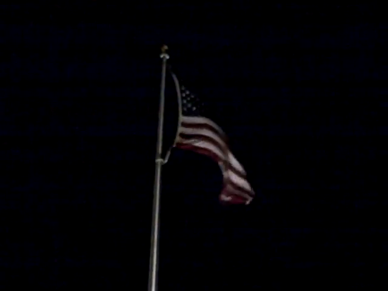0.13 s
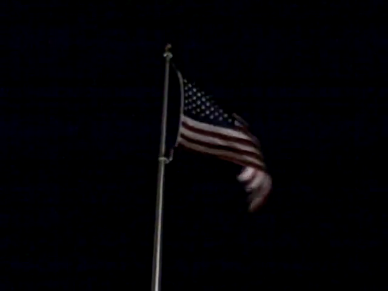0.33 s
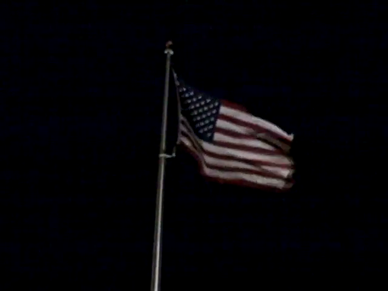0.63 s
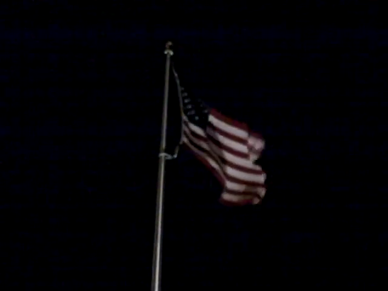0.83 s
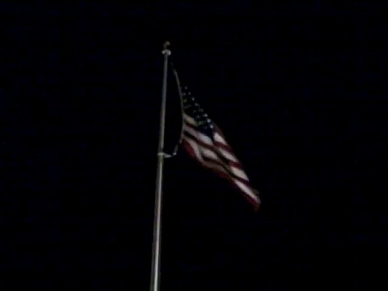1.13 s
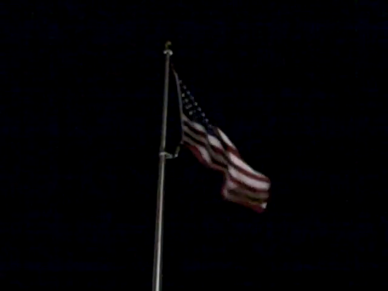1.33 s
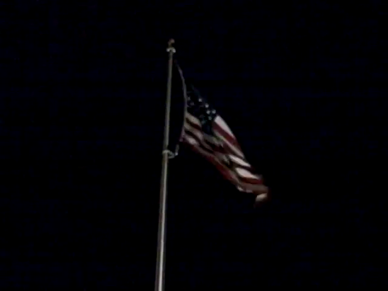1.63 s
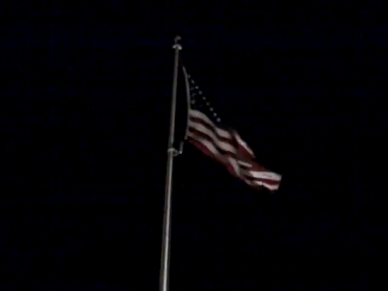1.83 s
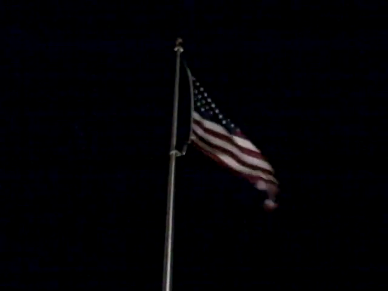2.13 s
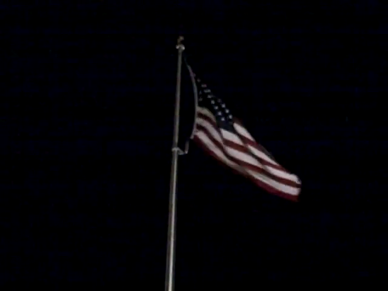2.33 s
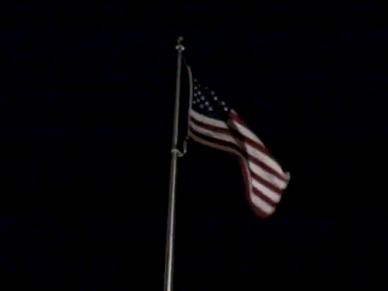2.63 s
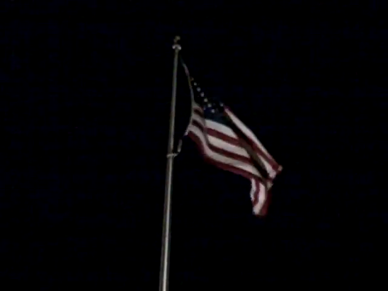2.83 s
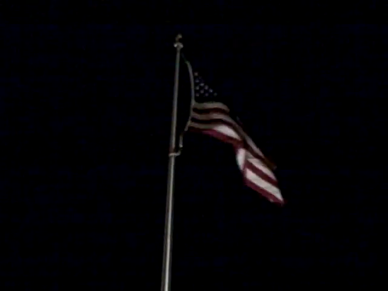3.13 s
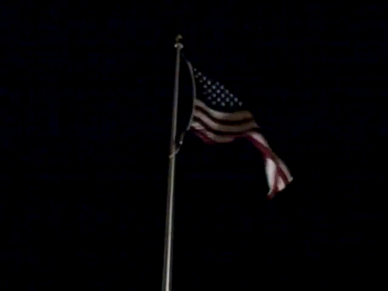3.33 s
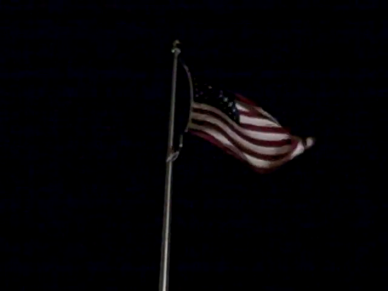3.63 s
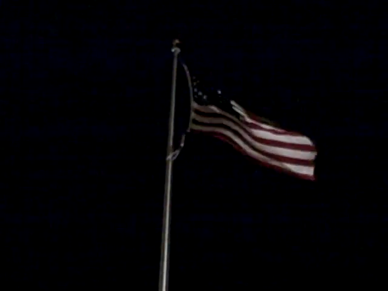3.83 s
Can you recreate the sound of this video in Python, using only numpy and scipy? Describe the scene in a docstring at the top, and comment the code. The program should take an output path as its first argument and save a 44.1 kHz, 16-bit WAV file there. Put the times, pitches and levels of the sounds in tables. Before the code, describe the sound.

Wind hitting the microphone in uneven gusts, with deep rumble, fluttering and dull thuds.

```python
"""Near a flagpole at night, gusty wind blows across a microphone.
Eddies hit it as sharp buffets, thuds and snaps, and the hardest overload the recorder.
Under them, passing turbulence flutters and large slow eddies make a low rumble.
Far back, a steady hiss slowly swells and sinks, with a faint rustle and a few ticks."""
import sys
import numpy as np
from scipy import signal
from scipy.fft import rfft, irfft
from scipy.io import wavfile
from scipy.ndimage import uniform_filter1d, map_coordinates

SR = 44100
rng = np.random.default_rng(int(sys.argv[2]) if len(sys.argv) > 2 else 0)


def store_pcm(level_fs):
    """Save levels as 16-bit WAV."""
    pcm = np.round(np.clip(level_fs, -1, 1) * 32767).astype(np.int16)
    wavfile.write(sys.argv[1], SR, np.atleast_2d(pcm).T)


N = 4 * SR

# Tone of one buffet, a thick low body with a dull top: eddy_rate_multiple, gain_db
BUFFET_TONE = [(.05, -19), (.25, -5), (.6, 2), (1, -2), (1.4, -11.5), (2, -22.5), (4, -44), (9, -60.5),
               (30, -65), (55, -73)]
def buffet(length_s, level_db, eddy_hz):
    """A knot of eddies presses on the mic with even force, in surges: faster eddies sound brighter."""
    t = np.arange(0, length_s, 1 / SR)
    swell_s = 0.075 * length_s  # longer buffets take longer to build and to die
    attack_s, release_s = 0.0022 + swell_s, 0.006 + swell_s
    ramp = np.clip(np.minimum(t / attack_s, (length_s - t) / release_s), 0, 1)
    envelope = np.sin(np.pi / 2 * ramp) ** 2
    eddies = noise(BUFFET_TONE, eddy_hz, size=8192)
    surge_octaves = 0.25 * np.tanh(wander(hz=221.3, size=8192))
    eddies = drift(eddies, surge_octaves)
    force = np.sqrt(uniform_filter1d(uniform_filter1d(eddies ** 2, size=400), size=400))
    return amp(level_db) * unit_rms(envelope * (eddies / force)[:len(t)])


# Wind hits, right up front: start_s, length_s, level_db, eddy_hz
BUFFET_CUES = [(0, 0.026, -14.5, 285), (.088, .13, -12.5, 396), (0.112, 0.11, -25, 970),
               (.134, 0.04, -12.5, 494), (.195, 0.014, -12.5, 517), (0.332, 0.069, -24, 410),
               (0.468, 0.074, -17.5, 336), (0.545, 0.018, -12.5, 396), (0.757, 0.014, -15.5, 436),
               (0.786, 0.032, -16, 354), (1.0, 0.059, -14.5, 287), (1.14, 0.012, -14, 300),
               (1.179, 0.031, -16, 310), (1.251, 0.016, -14, 308), (1.276, 0.033, -13, 360),
               (1.364, .102, -10.5, 350), (1.39, 0.025, -8.5, 400), (1.416, 0.019, -7.5, 398),
               (1.516, 0.02, -7.5, 296), (1.535, 0.034, -10, 308), (1.591, 0.074, -8.5, 360),
               (1.607, 0.064, -23.5, 980), (1.665, 0.026, -13.5, 404), (1.691, 0.025, -10, 336),
               (1.713, 0.028, -15.5, 294), (1.795, 0.084, -20.5, 269), (1.888, 0.024, -19, 262),
               (1.946, 0.014, -18, 353), (2.168, 0.043, -23, 280), (2.27, 0.0395, -18, 208),
               (2.707, 0.016, -20, 495), (2.724, 0.0324, -21.5, 390), (3.025, 0.014, -11.5, 356),
               (3.04, 0.062, -16, 300), (3.061, 0.02, -9, 302), (3.162, 0.02, -7, 475),
               (3.182, 0.0095, -13.5, 700), (3.245, 0.015, -12.5, 587), (3.265, 0.017, -18, 595),
               (3.31, 0.063, -12, 467), (3.341, 0.015, -10.5, 564), (3.403, 0.017, -15, 388),
               (3.769, 0.032, -22, 530), (3.889, 0.056, -28, 534)]
def buffets():
    """Gusts strike the microphone in clusters of short blows."""
    out = np.zeros(N)
    for start_s, length_s, level_db, eddy_hz in BUFFET_CUES:
        add(out, start_s, buffet(length_s, level_db, eddy_hz))
    return out


# Thuds and snaps that punch through the gusts: centre_s, peak_db, eddy_hz
POP_CUES = [(0.138, 1.5, 397), (.143, 3, 418), (.204, -8, 990), (.992, -2, 320), (1.424, 3.5, 328),
            (1.601, -17, 1410), (1.657, -14.5, 1640), (1.932, -3, 263), (1.981, -4, 350),
            (2.712, -11.5, 394), (3.07, 1, 232), (3.175, -13.5, 1100), (3.348, 4.5, 470),
            (3.408, -1.5, 376)]
def eddy_pops():
    """A lone eddy makes one rounded swing of pressure: a thud when slow, a snap when fast."""
    out, t = np.zeros(N), np.arange(N) / SR
    for centre_s, peak_db, eddy_hz in POP_CUES:
        phase_squared = np.minimum((np.pi * eddy_hz * (t - centre_s)) ** 2, 50)
        out += amp(peak_db) * (2 * phase_squared - 1) * np.exp(-phase_squared)
    return out


# Fader ride of the air between the hits: time_s, level_db
FLOW_RIDE = [(0, -20.5), (.22, -19.5), (.3, -24), (.42, -24), (.58, -18.5), (.68, -23.5), (.8, -20),
             (.95, -33), (1.04, -20), (1.13, -24), (1.48, -25), (1.97, -28), (2.04, -35), (2.14, -26.5),
             (2.24, -35), (2.33, -24.5), (2.42, -35), (2.66, -32), (2.76, -26), (2.82, -33), (2.98, -35),
             (3.1, -24), (3.42, -23), (3.52, -30), (3.8, -24.5), (3.86, -31), (3.92, -23.5), (4, -30)]
# Tone of that air, deep sub under a low hump: eddy_rate_multiple, gain_db
FLOW_TONE = [(.05, 8.5), (.3, -11), (.7, 5), (1, -1), (1.5, -9), (2.2, -22.5), (4, -51), (10, -55),
             (50, -67)]
def airflow():
    """Turbulence drifts past the microphone, louder and quicker as the air speeds up."""
    flutter_db, octaves_per_db, eddy_hz = 4.7, 0.052, 256
    level_db = curve(FLOW_RIDE) + flutter_db * np.tanh(wander(hz=61.4))
    eddies = noise(FLOW_TONE, eddy_hz, size=2 * N)
    return amp(level_db) * drift(eddies, octaves_per_db * (level_db - level_db.mean()))


# Fader ride of the low end, before the trim: time_s, level_db
RUMBLE_RIDE = [(0, -30), (.16, -13.5), (.3, -17.5), (.6, -18), (.87, -23), (.95, -17), (1.2, -22.5),
               (1.28, -12), (1.49, -31.5), (1.63, -12.5), (1.8, -27.5), (1.92, -19), (2.17, -22),
               (2.23, -45), (2.28, -13.5), (2.48, -32), (2.76, -15.5), (2.92, -33.5), (3.05, -15),
               (3.3, -15), (3.6, -15.5), (4, -21)]
# Tone of the rumble, nearly all sub and bass: frequency_hz, gain_db
RUMBLE_TONE = [(8, -22), (20, 0), (45, -3.5), (80, -2.5), (120, -6.5), (200, -19), (400, -47),
               (1000, -84.5)]
def rumble():
    """Large slow eddies press on the microphone in lumps."""
    trim_db, lumps_db = -3.5, wander(hz=7.1)
    return amp(trim_db + curve(RUMBLE_RIDE) + lumps_db) * noise(RUMBLE_TONE)


# Slow swells of the background bed, before the trim: time_s, level_db
HISS_RIDE = [(0, -45), (.35, -49.5), (.95, -45), (1.35, -46), (1.7, -51), (2.02, -50.5), (2.55, -46.5),
             (2.95, -46.5), (3.4, -49), (4, -46.5)]
# Tone of the bed, full mids and a soft top: frequency_hz, gain_db
HISS_TONE = [(100, 7.5), (300, 9), (850, 9.5), (1300, 5.5), (2000, 0), (5000, -0.5), (6800, -1.5),
             (8500, -8), (10000, -15.5), (11500, -23.5), (17000, -28)]
def hiss(trim_db=6):
    """A smooth outdoor hiss, with patches of its spectrum drifting up and down by about 1 dB."""
    spectrogram = signal.stft(noise(HISS_TONE), nperseg=512)[2]
    speckle = rng.standard_normal(spectrogram.shape)
    across_pitch = uniform_filter1d(speckle, size=9, axis=0)
    patches_db = unit_rms(uniform_filter1d(across_pitch, size=12, axis=1))
    bed = signal.istft(spectrogram * amp(patches_db), nperseg=512)[1][:N]
    return amp(trim_db + curve(HISS_RIDE)) * bed


# Faint, bright details: start_s, decay_s, level_db, centre_hz, width_octaves
RUSTLE_CUES = [(2.224, .004, -47.5, 8500, 0.23), (3.615, .014, -36.5, 3850, 0.53),
               (3.629, 0.014, -42, 6100, 0.097)]
def rustles(rise_s=0.0006):
    """Short scuffs and ticks, perhaps from the flag and its rope."""
    out, t = np.zeros(N), np.arange(SR // 2) / SR
    hz = np.fft.rfftfreq(len(t), 1 / SR) + 1
    for start_s, decay_s, level_db, centre_hz, width_octaves in RUSTLE_CUES:
        band = np.exp(-0.5 * (np.log2(hz / centre_hz) / width_octaves) ** 2)
        envelope = np.minimum(t / rise_s, 1) * np.exp(-t / decay_s)
        add(out, start_s, amp(level_db) * envelope * shaped_noise(band, len(t)))
    return out


def amp(db):
    """Decibels to gain."""
    return 10 ** (np.asarray(db) / 20)


def unit_rms(x):
    """Scales to rms 1."""
    return x / np.sqrt(np.mean(x ** 2) + 1e-20)


def curve(ride):
    """A fader ride read at every sample."""
    return np.interp(np.arange(N) / SR, *np.transpose(ride))


def shaped_noise(gain, size):
    """Noise of rms 1, weighted by one gain per frequency bin."""
    return unit_rms(irfft(rfft(rng.standard_normal(size)) * gain, size))


def noise(tone, unit_hz=1, size=N):
    """Noise through a tone curve whose frequencies count in units of unit_hz."""
    points, gain_db = np.transpose(tone)
    bins = np.fft.rfftfreq(size, 1 / SR) / unit_hz
    return shaped_noise(amp(np.interp(np.log(bins + 1e-6), np.log(points), gain_db)), size)


def wander(hz, size=N):
    """Random motion of rms 1, rolling off above the given rate."""
    f = np.fft.rfftfreq(size, 1 / SR)
    return shaped_noise(np.sqrt(f) / (f + hz / 10) * np.exp(-(f / hz) ** 2), size)


def drift(eddies, octaves):
    """Carries a pattern of eddies past the microphone at a changing speed."""
    return map_coordinates(eddies, [np.cumsum(2 ** octaves)], order=3, mode="grid-wrap")


def add(mix, start_s, sound):
    """Mixes a sound in at start_s."""
    part = mix[max(round(start_s * SR), 0):][:len(sound)]
    part += sound[:len(part)]


def scene():
    """Wind on the microphone over the background, in mono."""
    return (buffets() + eddy_pops() + airflow() + rumble() + hiss() + rustles())[None]


def record(dry):
    """The hardest hits clip, with a tiny click going in and out of overload; a low-pass follows."""
    click_db, cutoff_hz = -32.5, 17200
    clipped = np.clip(dry, -1, 1)
    clicks = amp(click_db) * np.diff(np.sign(dry - clipped), prepend=0)
    lowpass = signal.firwin(511, cutoff_hz, window=("kaiser", 9), fs=SR)
    return signal.oaconvolve(clipped + clicks, lowpass[None], "same")


dry = scene()
out = record(dry)
store_pcm(out)
```